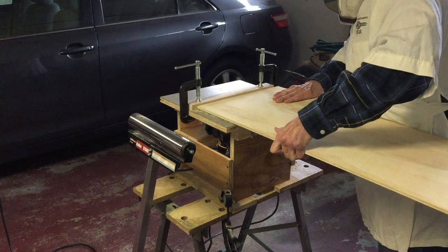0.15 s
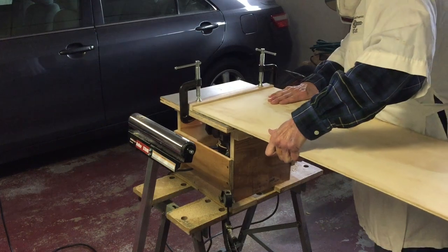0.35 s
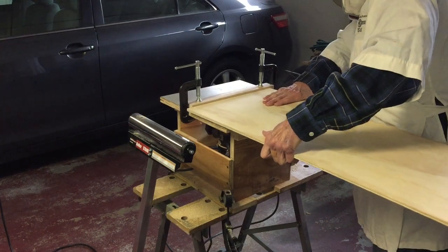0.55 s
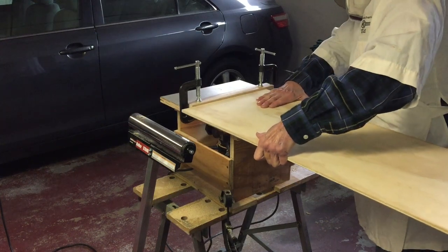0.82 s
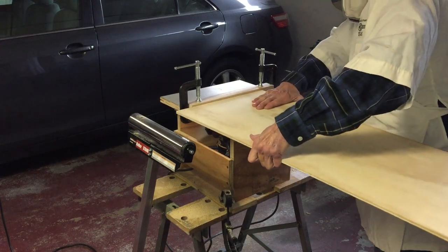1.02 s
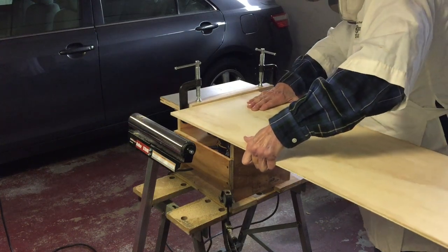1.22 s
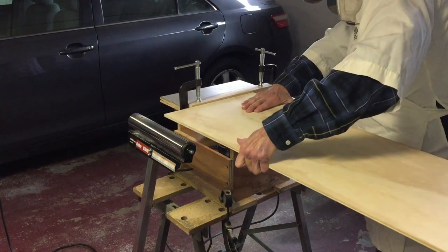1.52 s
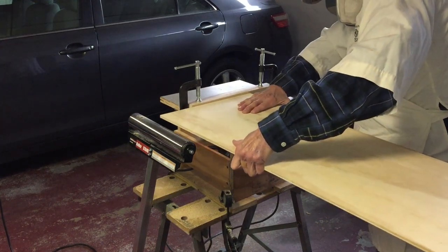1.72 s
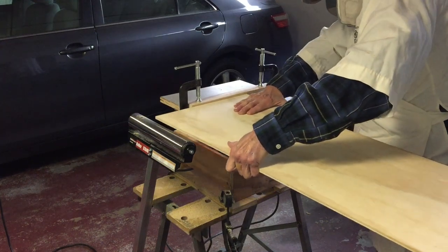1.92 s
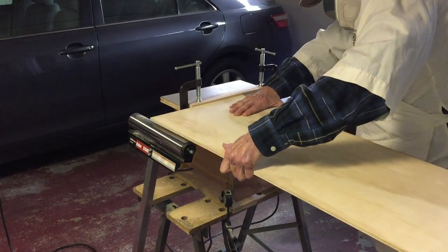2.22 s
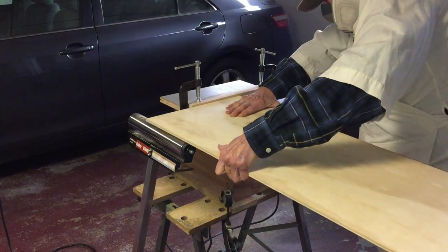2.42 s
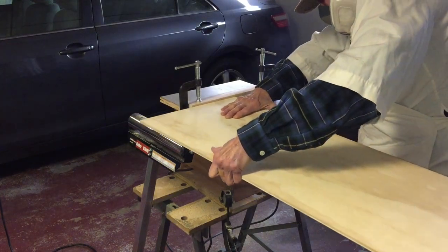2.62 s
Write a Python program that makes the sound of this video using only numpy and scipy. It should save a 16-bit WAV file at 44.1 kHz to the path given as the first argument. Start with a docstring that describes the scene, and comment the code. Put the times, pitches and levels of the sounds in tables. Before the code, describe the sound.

Piercing electric router whine with airy hiss, its pitch sagging slightly while cutting wood in a garage.

```python
"""A router's scream throughout: a table-mounted wood router in a garage, a board pushed along its cutter.
The blade rate sags under the cut and recovers as the feed eases; sines at its first eight multiples whistle.
Each overtone swells and fades as it slides through the room's standing waves, on a level curve of its own.
Under it, shaped noise is the hiss of air and chips; gliding sines are the board's faint hum on the table."""
import sys
import numpy as np
from scipy import signal
from scipy.fft import rfft, irfft, next_fast_len
from scipy.io import wavfile
from scipy.ndimage import uniform_filter1d, map_coordinates

SR = 44100
rng = np.random.default_rng(int(sys.argv[2]) if len(sys.argv) > 2 else 0)


def file_out(sig):
    """Save sig as 16-bit WAV at sys.argv[1]."""
    # one column per channel
    cols = np.atleast_2d(sig).T
    # limit, then scale
    lim = np.clip(cols, -1, 1)
    pcm = np.round(lim * 32767).astype(np.int16)
    wavfile.write(sys.argv[1], SR, pcm)


N = 121275

# blade rate, low while the cutter bites: [t/s, f/Hz]
BLADE_RATE_HZ = [(0.0, 1970), (0.12, 2089), (0.19, 2113), (0.28, 1966), (0.33, 1939), (0.41, 1915),
                 (0.53, 1897), (0.79, 1888), (0.87, 1943), (1.12, 1890), (1.25, 1919), (1.36, 1893),
                 (1.46, 1892), (1.62, 1931), (1.73, 1943), (1.8, 1946), (1.93, 1904), (2.14, 1894),
                 (2.27, 1906), (2.34, 1994), (2.48, 1927), (2.55, 1909), (2.61, 1917), (2.75, 2059)]
# rms level of each whistle partial, from the blade rate up: [t/s, level/dB]
PARTIAL_1_DB = [(0.0, -26), (0.08, -28), (0.12, -27), (0.29, -36.5), (0.31, -55), (0.35, -42.5),
                (0.91, -38.5), (1.01, -54), (1.11, -36.5), (1.24, -47), (1.71, -37), (1.84, -43.5),
                (2.27, -43), (2.3, -35.5), (2.38, -37.5), (2.41, -72), (2.47, -39), (2.58, -42),
                (2.75, -28)]
PARTIAL_2_DB = [(0.0, -32.5), (0.14, -38), (0.16, -24), (0.202, -17), (0.228, -54), (0.249, -19),
                (0.289, -26.5), (0.308, -20.5), (0.41, -28.5), (0.48, -20.5), (0.81, -23), (0.843, -33),
                (0.88, -24.5), (0.966, -39.5), (1.05, -20), (1.25, -26.5), (1.3, -20), (1.5, -23),
                (1.62, -32.5), (1.78, -27), (1.92, -19.5), (2.26, -21.5), (2.291, -31.5), (2.45, -31.5),
                (2.48, -22), (2.59, -19.5), (2.62, -30.5), (2.75, -33.5)]
PARTIAL_3_DB = [(0.0, -39), (0.19, -33.5), (0.31, -23.5), (0.338, -42), (0.37, -26), (0.5, -25),
                (0.62, -32.5), (0.7, -24.5), (0.785, -36), (0.82, -25), (0.89, -31), (1.04, -23.5),
                (1.11, -35), (1.29, -25), (1.34, -29), (1.5, -31), (1.65, -26), (1.7, -32), (1.8, -39),
                (1.835, -20.5), (1.88, -26.5), (2.269, -27), (2.3, -34), (2.39, -31), (2.425, -24),
                (2.455, -37), (2.48, -22.5), (2.59, -24), (2.63, -39)]
PARTIAL_4_DB = [(0.0, -37), (0.26, -21.5), (0.29, -31), (0.35, -25), (0.45, -26.5), (0.5, -38),
                (0.64, -33.5), (0.73, -59), (0.77, -25), (0.84, -34), (0.931, -21.5), (0.99, -33),
                (1.031, -20.5), (1.08, -28), (1.23, -29), (1.3, -23), (1.455, -58), (1.49, -25),
                (1.64, -55), (1.91, -26), (1.95, -35), (2.41, -33.5), (2.47, -22.5), (2.57, -26.5),
                (2.621, -29)]
PARTIAL_5_DB = [(0.0, -35.5), (0.18, -21), (0.21, -25), (0.38, -34.5), (0.42, -27), (0.49, -29),
                (0.7, -24.5), (0.84, -36.5), (0.88, -23), (0.94, -52), (1.02, -25.5), (1.16, -25.5),
                (1.25, -40), (1.31, -34), (1.34, -23), (1.49, -25.5), (1.51, -32), (1.64, -36),
                (1.81, -24.5), (1.86, -34), (1.97, -25.5), (2.18, -20.5), (2.27, -33.5), (2.55, -29.5),
                (2.62, -33.5), (2.75, -29)]
PARTIAL_6_DB = [(0.0, -33.5), (0.32, -28), (0.4, -25.5), (0.46, -26.5), (0.7, -24), (0.9, -38),
                (0.97, -19.5), (1.01, -28.5), (1.22, -32.5), (1.28, -23), (1.45, -40), (1.48, -26),
                (2.4, -32), (2.44, -23.5), (2.5, -32), (2.57, -25.5), (2.65, -31)]
PARTIAL_7_DB = [(0.0, -28), (0.42, -38), (0.56, -33), (0.7, -52), (1.03, -28.5), (1.17, -46), (1.63, -29),
                (1.84, -26), (1.91, -54), (2.31, -35), (2.38, -23), (2.75, -35)]
PARTIAL_8_DB = [(0, -30), (.43, -25.5), (.93, -30), (1.38, -24.5), (2.15, -42), (2.53, -29)]
# hiss level before HISS_GAIN_DB: [t/s, level/dB]
HISS_CURVE_DB = [(0, -34.5), (.19, -33.5), (.26, -37), (.76, -40.5), (.93, -37), (1.5, -40), (1.72, -35.5),
                 (1.92, -39.5), (2.28, -40), (2.43, -36.5), (2.61, -40), (2.75, -36)]
# relative spectrum of rushing air and chips: [f/Hz, density/dB per Hz]
AIR_SPECTRUM_DB = [(150, -43), (240, -21.5), (500, -23), (700, -26), (1000, -21), (1170, -6), (1600, -13),
                   (2150, -9), (3100, -5), (3650, 3), (4100, -4), (5400, 4), (6150, -3), (8700, 2.5),
                   (12000, -3.5), (13300, 0.5), (15700, -0.5)]
# motor housing resonances: [f/Hz, width/Hz, boost/dB]
HOUSING_MODES = [(1743, 204, 16), (5060, 100, 2), (6740, 185, 9.5), (13800, 130, 7), (14290, 140, 7)]
# board rubbing on the table: [t/s, length/s, start f/Hz, end f/Hz, gain before the arch/dB]
BOARD_RUBS = [(.4, .45, 352, 364, -62.5), (1.153, 0.8, 490, 537, -63), (2.55, 0.252, 335.4, 444.3, -51)]

FLUTTER_HZ, FLUTTER_KNOTS_PER_S = 0.1, 40  # blade rate unsteadiness
ROOM_T60_S, ROOM_DB = 0.17, -1  # echo decay; echo level at full share
LEVELLING_S = 0.069  # span over which the echo's beating is evened out
STEADY_ECHO_SHARE = 0.033  # echo share at steady speed
FULL_ECHO_GLIDE_HZ_PER_S = 1010  # partial's glide that adds a full share
GLIDE_SPAN_S = 0.12  # how long a speed change keeps the echo beating
HISS_GAIN_DB, CHIP_DB, CHIP_KNOTS_PER_S = 10, 0.39, 110
RIPPLE_DB, RIPPLE_KNOT_HZ, RIPPLE_FROM_HZ = 3, 50.02, 1400  # steady hiss ripple: depth, spacing, low edge
RUB_WAVER_SHARE, RUB_WAVER_KNOTS_PER_S = 0.0061, 39  # rub pitch unsteadiness
TOP_HZ = 15780


def whistle():
    """Sines at multiples of the blade rate; the faster one glides, the more it beats with its own echo."""
    blade_hz = smooth(curve(BLADE_RATE_HZ), 0.011)
    glide_hz_per_s = smooth(np.abs(np.gradient(blade_hz)) * SR, GLIDE_SPAN_S)
    flutter_hz = FLUTTER_HZ * wobble(FLUTTER_KNOTS_PER_S)
    phase = 2 * np.pi * np.cumsum(blade_hz + flutter_hz) / SR
    levels_db = [PARTIAL_1_DB, PARTIAL_2_DB, PARTIAL_3_DB, PARTIAL_4_DB,
                 PARTIAL_5_DB, PARTIAL_6_DB, PARTIAL_7_DB, PARTIAL_8_DB]
    out = np.zeros(N)
    for k, level_db in enumerate(levels_db, 1):
        echo_share = np.clip(STEADY_ECHO_SHARE + k * glide_hz_per_s / FULL_ECHO_GLIDE_HZ_PER_S, 0, 1)
        tone = garage(np.sin(k * phase), echo_share)
        local_rms = np.sqrt(np.abs(smooth(tone ** 2, LEVELLING_S)) + 1e-9)
        # linear-amplitude interpolation: round tops, narrow nulls
        swell = curve([(t_s, amp(db)) for t_s, db in level_db])
        out += swell * tone / local_rms
    return out


def garage(x, share):
    """Direct sound plus a share of a dense, exponentially decaying noise echo."""
    t_s = np.arange(SR // 2) / SR
    tail = rng.standard_normal(len(t_s)) * amp(-60 * t_s / ROOM_T60_S)
    tail /= np.linalg.norm(tail)
    echo = signal.fftconvolve(x, tail)[:N]
    return x + share * amp(ROOM_DB) * echo


def air():
    """Cooling air and flying chips: noise coloured by the housing, rippled by nearby reflections."""
    def spectrum_db(hz):
        ripple_db = RIPPLE_DB * (hz > RIPPLE_FROM_HZ) * wobble(1 / RIPPLE_KNOT_HZ, hz)
        return along(AIR_SPECTRUM_DB, hz) + housing_db(hz) + ripple_db

    hiss = noise(spectrum_db)
    chips_db = CHIP_DB * wobble(CHIP_KNOTS_PER_S)
    return hiss * amp(curve(HISS_CURVE_DB) + HISS_GAIN_DB + chips_db)


def housing_db(hz):
    """Resonant boosts of the motor housing, bell-shaped in dB."""
    return sum(boost_db / (1 + ((hz - center_hz) / (width_hz / 2)) ** 2)
               for center_hz, width_hz, boost_db in HOUSING_MODES)


def board():
    """The board hums as it rubs on the table: gliding, wavering sines that swell and fade."""
    out = np.zeros(N)
    for start_s, length_s, from_hz, to_hz, gain_db in BOARD_RUBS:
        u = np.clip((times() - start_s) / length_s, 0, 1)
        waver = 1 + RUB_WAVER_SHARE * wobble(RUB_WAVER_KNOTS_PER_S)
        hz = (from_hz + u * (to_hz - from_hz)) * waver
        arch = np.sqrt(u * (1 - u))  # peaks at 0.5
        out += amp(gain_db) * arch * np.sin(2 * np.pi * np.cumsum(hz) / SR)
    return out


def amp(db):
    """dB to linear amplitude."""
    return 10 ** (np.asarray(db) / 20)


def unit(x):
    """x scaled to rms 1."""
    return x / np.sqrt(np.mean(x ** 2) + 1e-20)


def times():
    """Sample times in s."""
    return np.arange(N) / SR


def curve(rows):
    """One value per sample, linear between (t/s, value) rows."""
    return np.interp(times(), *np.transpose(rows))


def along(points, hz):
    """Interpolate (f/Hz, value) points on a log-frequency axis."""
    f_hz, values = np.transpose(points)
    return np.interp(np.log(hz + 1), np.log(f_hz + 1), values)


def wobble(rate, along_axis=None):
    """Smooth random curve, rate knots per s (or per unit of another axis)."""
    where = times() if along_axis is None else along_axis
    return map_coordinates(rng.standard_normal(N), [where * rate], mode="wrap")


def filtered(x, response):
    """x filtered by a response of frequency; zero-padded FFT."""
    m = next_fast_len(N + SR // 2)
    hz = np.fft.rfftfreq(m, 1 / SR)
    return irfft(rfft(x, m) * response(hz), m)[:N]


def noise(db_at):
    """Noise of rms 1, spectrum shaped by db_at(hz)."""
    white = rng.standard_normal(N)
    return unit(filtered(white, lambda hz: amp(db_at(hz))))


def smooth(x, seconds):
    """Running mean, taken twice."""
    size = max(int(seconds * SR), 1)
    return uniform_filter1d(uniform_filter1d(x, size), size)


def scene():
    """Whistle, air and board summed to mono."""
    return (whistle() + air() + board())[None]


def record(dry):
    """Brick-wall low-pass at TOP_HZ."""
    return filtered(dry[0], lambda hz: hz < TOP_HZ)[None]


dry = scene()
out = record(dry)
file_out(out)
```